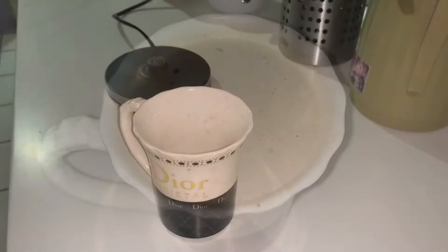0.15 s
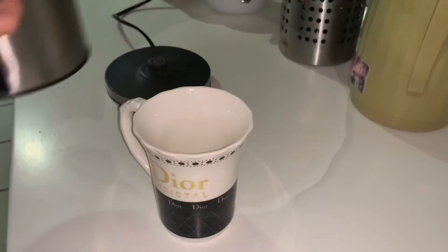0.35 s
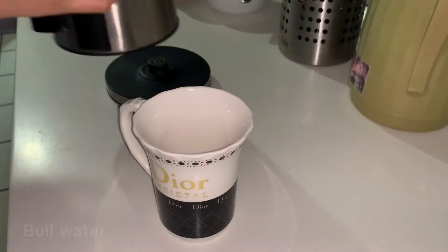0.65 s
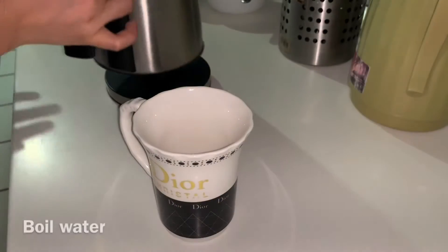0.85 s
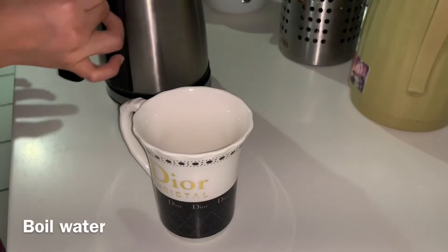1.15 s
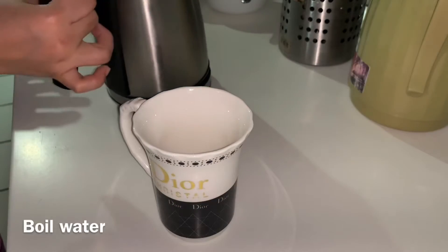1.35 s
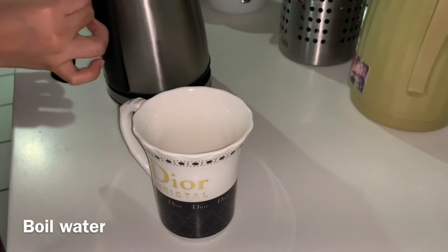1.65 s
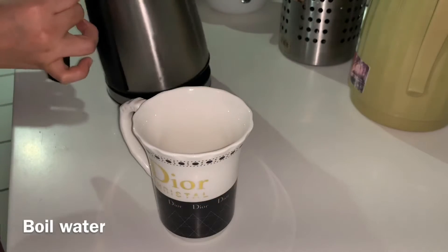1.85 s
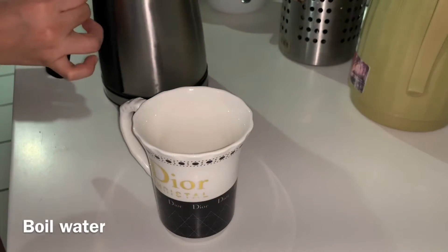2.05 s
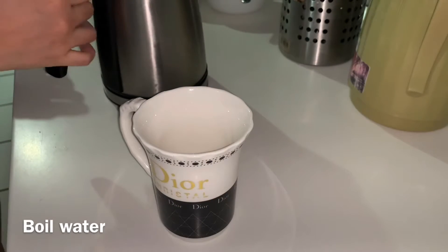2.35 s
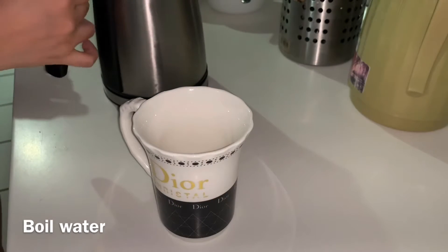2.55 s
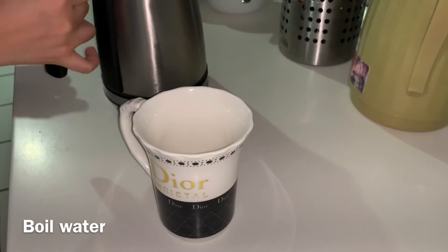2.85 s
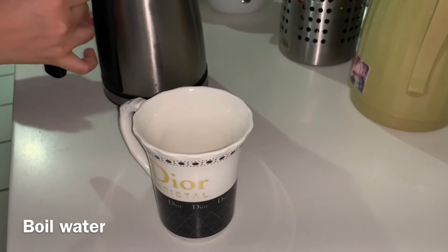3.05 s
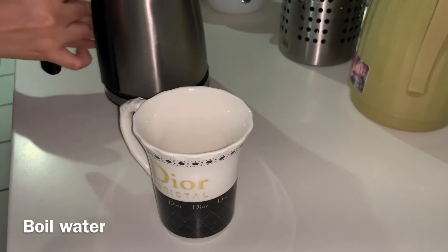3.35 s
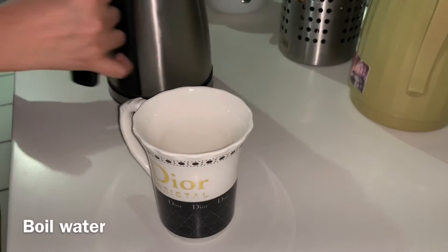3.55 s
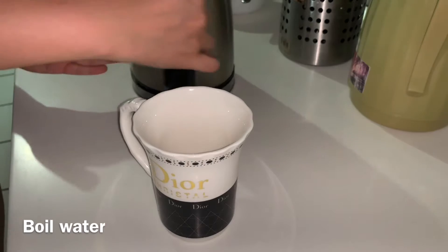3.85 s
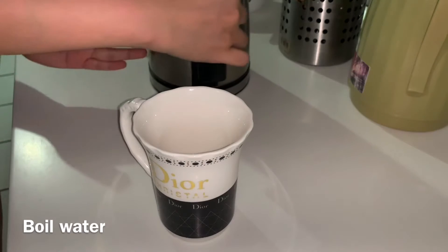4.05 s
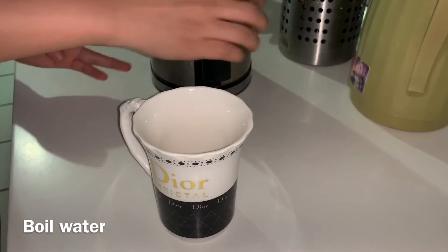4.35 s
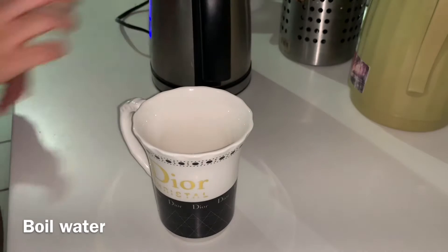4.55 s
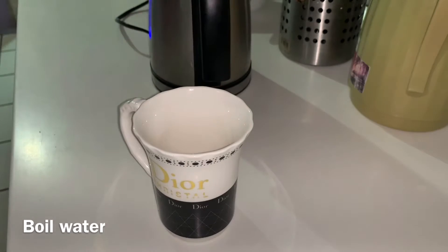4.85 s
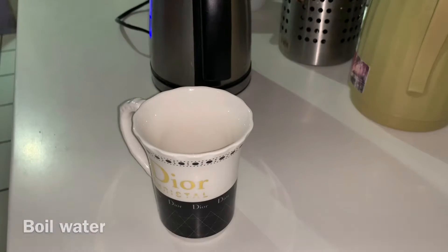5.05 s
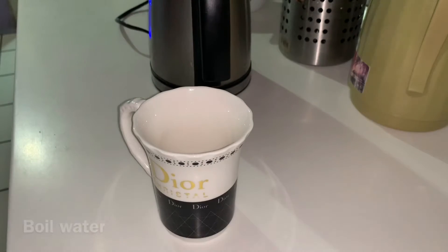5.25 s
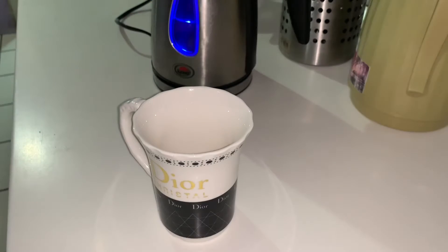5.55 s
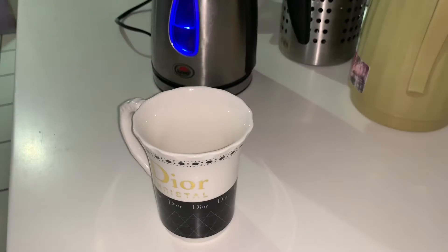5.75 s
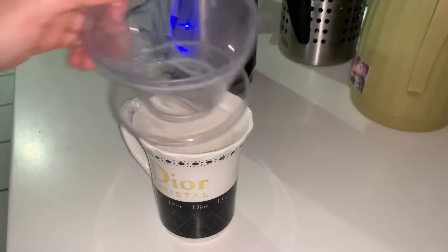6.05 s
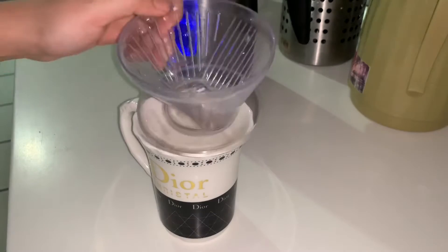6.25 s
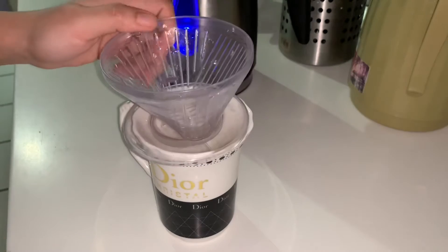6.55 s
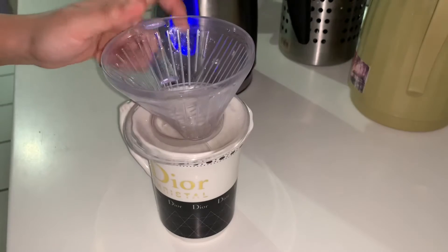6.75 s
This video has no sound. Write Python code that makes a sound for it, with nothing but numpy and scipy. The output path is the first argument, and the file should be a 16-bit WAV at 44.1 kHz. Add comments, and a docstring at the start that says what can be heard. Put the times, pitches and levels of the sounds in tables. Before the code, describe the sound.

A steel kettle lid snaps shut, the kettle knocks onto its base and grinds round, then heating hiss starts and a plastic dripper clatters onto a mug.

```python
"""In a small hard room with a low hum, a steel kettle's lid snaps shut: noise cracks plus ringing tones. The
kettle is set on its base with knocks, plops of water and booms of the counter, then turned into place in short
strokes of grainy noise, with clicks, a fingernail tap and crunches of the handle. Then a hiss comes in abruptly
and grows: tiny random clicks, for collapsing steam bubbles, ring the vessel. Last a plastic dripper clatters
onto a china mug; both ring as fading sines."""
import sys
import numpy as np
from scipy import signal
from scipy.fft import rfft, irfft, next_fast_len
from scipy.io import wavfile
from scipy.ndimage import uniform_filter1d, map_coordinates

SR = 44100
rng = np.random.default_rng(int(sys.argv[2]) if len(sys.argv) > 2 else 0)


def to_wav(sig):
    """Store sig (one row per channel, or 1-D mono) as 16-bit WAV at the path in sys.argv[1].

    Samples outside -1..1 are clipped; the rate is SR.
    """
    pcm = np.clip(np.atleast_2d(sig), -1, 1) * 32767
    pcm = np.round(pcm).astype(np.int16)
    wavfile.write(sys.argv[1], SR, pcm.T)  # frames by channels


N = 303893
TIME = np.arange(N) / SR  # seconds

# Levels in the tables are relative: scene() balances the layers afterwards.
# Room air and hum
# rumble of the air: f/Hz, level/dB
AIR_COLOUR = [(45, -6), (120, -5), (200, -11), (380, -16.5), (520, -24), (800, -22.5), (1200, -30),
              (2500, -38), (5000, -46), (8500, -49.5), (14000, -55.5), (15200, -67)]
# tones of an appliance: f/Hz, level/dB
HUM_TONES = [(82, -70), (119, -57.5), (241, -64), (350, -73.5)]

# A faint bright hiss at the very start, then strokes of the kettle sliding under the hand: t/s, length/s,
# level/dB, brightness/(dB per octave)
SLIDES = [(0.0, 0.14, -58, 5.5), (0.321, 0.037, -54.5, 4), (.62, 0.087, -56, 5.5), (0.712, 0.041, -59.5, 5),
          (1.336, 0.067, -53, -4), (1.798, 0.03, -35.5, -6.5), (2.977, 0.049, -63, -3.5),
          (3.251, 0.13, -58.5, 1.5), (3.445, 0.32, -65, 2.5), (3.8, 0.21, -61, -0.5),
          (4.141, 0.054, -55.5, 1.5), (4.326, 0.17, -67, 7), (4.65, 0.33, -66.5, 3),
          (4.946, 0.055, -49, 0.5)]
# colour of sliding plastic: f/Hz, level/dB
SLIDE_COLOUR = [(200, -8.5), (500, 0), (900, 2), (1200, -2), (2400, -1.5), (3300, -3), (5000, -10),
                (8000, -16), (13000, -30.5), (15000, -33)]
# shortest time to full pressure; time to fall 60 dB
SLIDE_ATTACK_S, SLIDE_RELEASE_S = 0.018, 0.38
# a longer stroke swells more slowly: this share of its length adds to its attack
SWELL_SHARE = 0.19

# Lid latch and lid seating: t/s, level/dB, brightness/(dB per octave), hollow ring/dB
LID_BLOWS = [(.0748, -12.5, 0, -23.5), (.0808, -12.5, -1.5, -15), (.083, -8.5, -2.5, 0.5)]
# tones of the lid: f/Hz, level/dB, time to fall 60 dB/s
LID_MODES = [(125, -7.5, .16), (207, -1.5, 0.12), (253, 10, 0.09), (324, 23.5, 0.03), (377.7, 0.5, 0.2),
             (540, -7, 0.12), (794, -8.5, 0.07), (1286, -12.5, 0.28), (1577, -8.5, .08), (1905, -17, 0.14),
             (2670, -12.5, .15), (2894, -9, 0.071), (4700, -29, 0.38), (5300, -23.5, 0.18)]
# contact noise of the lid: f/Hz, level/dB
LID_CRACK = [(200, 3.5), (380, 6.5), (520, -2.5), (800, -5.5), (1500, 0.5), (3600, -6.5), (5000, 8),
             (6500, -1.5), (10500, 1), (14000, -4.5), (15800, -19.5)]

# Bright rasps of the steel as it is lifted, dropped home and twisted: t/s, length/s, level/dB
RASPS = [(0.614, 0.15, -67), (1.833, 0.015, -42.5), (1.879, 0.0052, -35), (3.496, 0.23, -73.5),
         (3.8, 0.17, -70.5), (4.74, 0.25, -72.5)]
# colour of the rasps: f/Hz, level/dB
RASP_COLOUR = [(3000, -7), (6000, -7.5), (10500, 0), (14000, -6), (15500, -31)]

# The hollow foot scuffs as the kettle is carried and lowered: t/s, length/s, level/dB
SCUFFS = [(.631, 0.021, -42.5), (.69, 0.049, -53), (1.02, 0.0075, -42), (1.417, 0.016, -55),
          (1.47, 0.042, -60.5), (3.128, .02, -54), (3.85, 0.14, -70), (5.325, 0.014, -53)]
# colour of the scuffs: f/Hz, level/dB
SCUFF_COLOUR = [(300, 1), (600, -7), (1050, -4.5), (1900, -4), (2400, -19), (6000, -33.5)]

# Kettle against its base: t/s, level/dB, brightness/(dB per octave), hollow ring/dB
KNOCKS = [(.639, -30.5, -0.5, -20), (.704, -40, -15, -20), (1.0305, -10.5, 1.5, -5), (1.037, -12.5, 3, 8),
          (1.059, -23, -11, -6), (1.087, -25, 1.5, -7), (1.1445, -16, 0.5, -8), (1.153, -26.5, -1, 18.5),
          (1.2025, -17, 1, -27), (1.2478, -26, -0.5, -27), (1.417, -31.5, -4, 5), (1.8255, -14, 0.5, 1.5),
          (1.839, -18, -8, 5), (1.852, -22.5, -4, -9), (1.8905, -10.5, 1.5, -8), (2.137, -35.5, -4.5, -22),
          (3.14, -29.5, -0.5, -5), (3.766, -32.5, -3.5, -8), (3.842, -26, -2, -15), (3.897, -42, 4, 6),
          (4.226, -37, -10, -8), (4.604, -34.5, -10.5, 2.5), (4.698, -34.5, -1.5, 8),
          (5.119, -33, -3.5, 4.5), (5.328, -37.5, -2, 9.5)]
# tones of the kettle: f/Hz, level/dB, time to fall 60 dB/s
KETTLE_MODES = [(350, 9, 0.056), (351, -5.5, 0.12), (567, -2, 0.052), (791, 1.5, 0.1), (856, 1, 0.054),
                (938, 4.5, 0.072), (983, 2, 0.049), (1154, -7, 0.07), (1325, -3.5, 0.072),
                (1440, -6, 0.048), (1690, -3, 0.028), (1859, 1.5, 0.046), (2006, 0, 0.043), (2010, -30, 1),
                (2160, -2, 0.045), (2700, -5, 0.045), (2830, -9, 0.033), (3520, -19, 0.033)]
# contact noise of the kettle: f/Hz, level/dB
KETTLE_CRACK = [(130, 1.5), (500, -4.5), (1000, 3.5), (1600, -4), (2600, -11), (3800, -19), (7000, -35),
                (13000, -50), (16000, -65)]

# Water plops in the kettle as it is moved: t/s, starting f/Hz, level/dB
PLOPS = [(.737, 510, -37.5), (3.246, 590, -42), (3.305, 637, -39.5), (3.372, 342, -36.5), (3.468, 378, -43),
         (4.084, 384, -39.5)]
# ring time; pitch gained per second, as a share of the start pitch
PLOP_T60_S, PLOP_RISE_PER_S = 0.024, 2.9

# Weight landing on the counter: t/s, level/dB
THUMPS = [(1.034, -33.5), (1.148, -39.5), (1.83, -22.5), (1.89, -21.5), (2.102, -33.5), (2.596, -37.5),
          (3.139, -39), (3.339, -42.5), (3.441, -44), (3.904, -31.5), (4.093, -39), (4.229, -36),
          (4.613, -39), (4.712, -28), (5.032, -37), (5.132, -28.5), (6.357, -41.5)]
# tones of the counter: f/Hz, level/dB, time to fall 60 dB/s
COUNTER_MODES = [(59.7, -4, 0.53), (75.7, 2, 0.24), (113.9, -0.5, 0.33)]
# a landing of PUSH_REF_DB pushes for PUSH_S; the push doubles in length every PUSH_DOUBLING_DB above it
PUSH_S, PUSH_REF_DB, PUSH_DOUBLING_DB = 0.0076, -35, 28.5

# Handle and switch clicks: t/s, level/dB, brightness/(dB per octave), hollow ring/dB
CLICKS = [(2.403, -27, 1, -11), (2.6228, -27.5, 5.5, -15), (2.6322, -13, 5.5, 16.5), (2.639, -26, -12, -9),
          (3.016, -36.5, -1.5, -13)]
# tones of the handle and switch: f/Hz, level/dB, time to fall 60 dB/s
CLICK_MODES = [(408, -12, 0.046), (827, 0.5, 0.076), (1430, -2, 0.016), (1660, -8, 0.064), (2330, -7, .012),
               (3470, -27, 0.033), (4070, -18.5, .05)]
# contact noise of clicks and taps: f/Hz, level/dB
CLICK_CRACK = [(200, -15), (800, 1.5), (1150, -3), (1550, 7), (2200, -2.5), (3800, -7), (8000, -21.5),
               (14000, -33), (16000, -45)]

# Pushes that grind the kettle round on its base: t/s, length/s, level/dB
TURNS = [(3.231, 0.32, -53), (3.56, 0.46, -51.5)]
# colour of the grinding: f/Hz, level/dB
TURN_COLOUR = [(70, 22), (125, 18.5), (200, -4), (500, -4), (1000, -13.5), (1600, -6.5), (2400, -14),
               (3200, -18), (8000, -27.5)]
# resonances of the base under the turning foot: f/Hz, width/Hz, lift/dB
BASE_PEAKS = [(346, 58, 10), (887, 110, 23.5), (1207, 58, 16), (1940, 150, 9.5)]
# the foot catches at random while it is turned: middle level, and most it strays either way
CATCH_DB, CATCH_SPREAD_DB = -42, 2.5

# A fingernail taps the steel wall: t/s, level/dB, brightness/(dB per octave), hollow ring/dB
TAPS = [(3.488, -34.5, 8, 0)]
# tones of the steel wall: f/Hz, level/dB, time to fall 60 dB/s
STEEL_MODES = [(1980, -8, .2), (3170, 4, 0.051), (3247, -2.5, 0.15), (4590, -5, 0.038), (5260, -14, 0.042)]

# The plastic handle and switch crunch under the hand: t/s, length/s, level/dB
CRUNCHES = [(4.151, 0.013, -48.5), (4.812, 0.0076, -61), (4.96, 0.04, -53), (5.32, 0.021, -51.5)]
# colour of the crunches: f/Hz, level/dB
CRUNCH_COLOUR = [(500, 1), (1300, -2), (2200, 9), (3400, 0), (4500, -13), (8000, -20), (14000, -37)]

# Heating: colour of the hiss: f/Hz, level/dB
BOIL_COLOUR = [(100, -1), (280, -6.5), (400, -3), (700, -3.5), (1050, -6), (1400, -1), (2100, -1),
               (2900, -4.5), (4300, -5.5), (6300, -13.5), (8300, -13), (11000, -20.5), (14300, -26.5),
               (15500, -63)]
# resonances of the water-filled vessel: f/Hz, width/Hz, lift/dB
VESSEL_PEAKS = [(359, 50, 12.5), (465, 48, 13.5), (607, 92, 2.5), (794, 54, 15.5), (917, 68, 21.5),
                (1247, 185, 10.5), (1416, 140, 6.5), (1784, 44, 13.5), (2630, 240, 7.5), (3090, 54, 7.5),
                (3780, 140, 6.5), (4530, 110, 7), (6250, 360, 4), (7300, 190, 3), (8300, 350, -1)]
# colour of the rarer, larger bubbles, which pop in the middle range: f/Hz, level/dB
POP_COLOUR = [(400, 3.5), (1000, -4), (1600, -4.5), (2400, -13), (5000, -27), (12000, -21)]
# the hiss comes in abruptly, then grows slowly
HISS_START_S, HISS_ATTACK_S, HISS_DB, HISS_GROWTH_DB_PER_S = 5.386, 0.026, -37.5, 0.95

# Dripper on the mug rim: t/s, level/dB, brightness/(dB per octave), hollow ring/dB, mug ring/dB
DRIPPER_BLOWS = [(6.2151, -9, 2.5, 5.5, -2.5), (6.221, -22, -10, -4, -15), (6.2387, -12.5, -1, -5, -13),
                 (6.252, -17.5, -3, -1.5, -10), (6.261, -19, -1.5, -1.5, -10),
                 (6.3272, -16.5, -3, -12, -3.5), (6.347, -16.5, -7, 9, 7), (6.3517, -6, -0.5, 9.5, 2),
                 (6.358, -18.5, -3, 8, 2), (6.367, -14, -2.5, 13.5, 3), (6.373, -19, -1, 12.5, -2),
                 (6.398, -18, -3, 8, -8), (6.4411, -17, -0.5, 14.5, -9), (6.45, -24, -3, 8, -19),
                 (6.528, -21, -4, -5, -5)]
# tones of the dripper: f/Hz, level/dB, time to fall 60 dB/s
DRIPPER_MODES = [(111, 0, 0.12), (224, -14, 0.19), (453, -11, 0.056), (752, -0.5, 0.084), (928, -5, 0.073),
                 (1234, 8, .06), (1378, 8, 0.04), (1826, 6, 0.07), (1960, 7, 0.046), (2131, 11.5, 0.069),
                 (2360, -3, .035), (2600, 3, 0.097), (3235, 9.5, 0.06), (3426, 7.5, 0.045),
                 (3740, 8, 0.032), (4700, 1, 0.062), (6080, 3, 0.021), (6790, 7, 0.038), (10300, -5, .025),
                 (12050, 1, 0.02)]
# contact noise of the dripper: f/Hz, level/dB
DRIPPER_CRACK = [(300, 6.5), (800, -2), (2000, 3), (3400, 5.5), (4300, 2), (8200, 4), (9300, 4),
                 (10400, 7.5), (11600, -7), (13300, -2), (15200, -18), (16000, -17)]
# tones of the china mug: f/Hz, level/dB, time to fall 60 dB/s
MUG_MODES = [(1197, 10, 0.056), (3567, 8, .05), (5070, 0.5, 0.081), (6370, 5, 0.062), (8140, 9.5, 0.039),
             (10540, 3.5, 0.024), (12100, 2, .02), (12800, 4, 0.021), (13400, 6, .03)]

# time a contact takes to build up its force; touches per second of loose parts after a blow
CONTACT_RISE_S, RATTLE_PER_S = 0.0011, 900
# moving water and a shifting grip make resonances waver by about these shares
WATER_WAVER, GRIP_WAVER = 0.014, 0.02


def undb(db):
    """Decibels to gain."""
    return 10 ** (np.asarray(db) / 20)


def unit(x):
    """Scale to an rms (average strength) of 1."""
    return x / np.sqrt(np.mean(x ** 2))


def fade(t, t60):
    """Exponential decay, by 60 dB in t60 seconds."""
    return np.exp(-np.log(1000) * t / t60)


def add(track, s, sound):
    """Mix a sound into a track, starting at s seconds."""
    i = int(s * SR)
    track[i:i + len(sound)] += sound[:N - i]


def walk(rate):
    """Slow random wander around zero, heading for a new value `rate` times a second."""
    k = int(SR / rate)
    steps = np.repeat(rng.standard_normal(N // k + 2), k)
    return uniform_filter1d(steps, k)[:N]


def colour(x, points, tilt_db=0, peaks=()):
    """Filter by a smooth spectrum, a slope per octave and resonances."""
    size = next_fast_len(x.shape[-1] + 2048)
    f = np.maximum(np.fft.rfftfreq(size, 1 / SR), 1)
    hz, db = np.transpose(points)
    # the slope pivots at 1500 Hz and is flat below 300 Hz
    slope_db = tilt_db * np.log2(np.maximum(f, 300) / 1500)
    gain = undb(np.interp(np.log(f), np.log(hz), db) + slope_db)
    gain = gain * np.minimum(f / hz[0], 1) ** 2  # falls away below the first point
    lifts = sum((undb(lift) ** 2 - 1) / (1 + (2 * (f - centre) / width) ** 2) ** 2
                for centre, width, lift in peaks)
    gain = gain * np.sqrt(1 + lifts)
    return irfft(rfft(x, size) * gain, size)[..., :x.shape[-1]]


def diffuse(pair, alike_hz):
    """Two unrelated signals become sound from all around: long waves reach both ears alike."""
    a, b = rfft(pair)
    f = np.fft.rfftfreq(pair.shape[1], 1 / SR)
    alike = 0.92 / (1 + (f / alike_hz) ** 2)
    mid = a * np.sqrt((1 + alike) / 2)
    side = b * np.sqrt((1 - alike) / 2)
    return irfft(np.array([mid + side, mid - side]), pair.shape[1])


def burst(t, t60, rise_s=0):
    """Decaying noise with a nearly even spectrum: a dense cluster of tiny impulses."""
    rise = 1 - np.exp(-(t + 1 / SR) / (rise_s + 1 / SR))
    x = rng.standard_normal(len(t)) * fade(t, t60) * rise
    for _ in range(4):
        even = irfft(np.exp(1j * np.angle(rfft(x))), len(t))  # same strength at every frequency
        x = even * fade(t, 10 * t60)
    return x


def stroke(start_s, length_s, attack_s, release_s):
    """One movement of the hand: pressure swells, holds for the stroke and dies away."""
    t = TIME - start_s
    swell = np.clip(t / (attack_s + SWELL_SHARE * length_s), 0, 1)
    return swell * fade(np.maximum(t - length_s, 0), release_s)


def waver(x, share, rate):
    """Let all resonances drift up and down together, by reading the sound at an uneven speed."""
    place = np.arange(N) + share * np.cumsum(walk(rate))
    return np.apply_along_axis(lambda v: map_coordinates(v, [place], order=3, mode="mirror"), -1, x)


def flurries(x, depth_db, rate):
    """Each octave swells and ebbs on its own, as bubbles or catches of one size come in bunches."""
    size = next_fast_len(N)
    f = np.maximum(np.fft.rfftfreq(size, 1 / SR), 1)
    octave = np.clip(np.log2(f / 250), 0, 5)
    spectrum = rfft(x, size)
    out = 0
    for k in range(6):
        share = np.maximum(1 - np.abs(octave - k), 0)  # neighbouring bands overlap
        band = irfft(spectrum * share, size)[..., :N]
        out = out + band * undb(depth_db * walk(rate))
    return out


def ring(modes, lift_db, hollow_hz, detune):
    """The modes of a struck thing; grip and point of contact shift their pitch and strength a little."""
    t = np.arange(SR // 3) / SR
    hz, db, t60 = np.transpose(modes)[:, :, None]
    strength, sign, pitch = rng.standard_normal((len(modes), 3)).T[:, :, None]
    # the low hollow modes all start the same way, the others either way
    side = np.where(hz < hollow_hz, 1, np.sign(sign))
    # a mode takes about one cycle to build up
    envelope = fade(t, t60) * (1 - np.exp(-t * hz))
    tones = np.sin(2 * np.pi * hz * (1 + detune * pitch) * t)
    return np.sum(side * undb(db + lift_db + 2 * strength) * envelope * tones, axis=0)


def blows(rows, modes, crack, contact_t60, rattle_db, rattle_t60, ring_db, hollow_hz, detune):
    """Each blow is a brief contact crack, a dying rattle of tiny rebounds, and the object's modes."""
    out, t = np.zeros(N), np.arange(SR // 3) / SR
    hz = np.array(modes)[:, :1]
    for s, db, tilt_db, hollow_db in rows:
        touches = rng.random(len(t)) < RATTLE_PER_S / SR
        rattle = rng.standard_normal(len(t)) * touches * fade(t, rattle_t60)
        contact = unit(burst(t, contact_t60, CONTACT_RISE_S)) + undb(rattle_db) * unit(rattle)
        # 5 ms of silence in front leaves room for the filter's spread
        noise = colour(np.pad(contact, (SR // 200, 0)), crack, tilt_db)
        noise = noise * np.sqrt(SR / 1000 / np.sum(noise ** 2))  # same energy for every blow
        add(out, s - 1 / 200, undb(db) * noise)
        # below hollow_hz the modes have their own level, above it they follow the brightness
        shape_db = np.where(hz < hollow_hz, hollow_db, tilt_db * np.log2(hz / hollow_hz))
        add(out, s, ring(modes, db + ring_db + shape_db, hollow_hz, detune))
    return out


def rub(rows, points, attack_s, release_s, grain_db, grains_per_s, peaks=()):
    """Stick and slip: grainy friction whose colour shifts with the grip, played in strokes."""
    slips = rng.standard_normal(N) * undb(grain_db * walk(grains_per_s))
    pressure = sum(undb(db) * stroke(s, length_s, attack_s, release_s) for s, length_s, db in rows)
    rubbing = waver(colour(slips, points, peaks=peaks), GRIP_WAVER, 12)
    return unit(rubbing) * pressure


def kitchen(x, lag_s, near_db, room_db, pan_db):
    """Direct sound, later on the left; quick reflections from counter and tiles; then the room's tail."""
    t = np.arange(SR * 2 // 3) / SR
    near = diffuse(np.array([burst(t, 0.032), burst(t, 0.053)]), 1400)
    near = near * ((t > 0.001) & (t < 0.1))
    tail = diffuse(rng.standard_normal((2, len(t))), 320) * (1 - np.exp(-t / 0.003))
    treble = signal.sosfilt(signal.butter(1, 7000, "high", fs=SR, output="sos"), tail)
    tail = (tail - treble) * fade(t, 0.37) + treble * fade(t, 0.32)  # treble dies sooner
    response = (undb(near_db) * unit(near) + undb(room_db) * unit(tail)) / np.sqrt(len(t))
    wet = signal.fftconvolve(x[None], response, axes=1)[:, :N]
    wet = colour(wet, [(100, -6.5), (400, -4.5), (900, 1.5), (14000, 2.0)])
    direct = np.array([np.roll(x, int(round(lag_s * SR))), x])
    # pan_db is how much louder the left is made than the right
    return (direct + wet) * undb(np.array([[pan_db], [-pan_db]]) / 2)


def background():
    """Low room rumble and a wavering appliance hum."""
    air = unit(colour(diffuse(rng.standard_normal((2, N)), 730), AIR_COLOUR))
    air = air * undb(-54.0 + 0.81 * walk(5.4))
    hum = sum(undb(db + 1.2 * walk(12.0)) * np.sin(2 * np.pi * hz * TIME + 0.7 * walk(7.6))
              for hz, db in HUM_TONES)
    return (air + hum) * undb(np.array([[-0.9], [0.9]]))


def sliding():
    """Fine catches of plastic on plastic, noise that is thicker and thinner along the stroke."""
    grain_db = 1.2 * rng.standard_normal(N) + 1.4 * walk(60)
    grains = rng.standard_normal(N) * undb(grain_db)
    out = np.zeros(N)
    for s, length_s, db, tilt_db in SLIDES:
        pressure = stroke(s, length_s, SLIDE_ATTACK_S, SLIDE_RELEASE_S)
        out += unit(colour(grains, SLIDE_COLOUR, tilt_db)) * undb(db) * pressure
    return undb(-2.5) * out


def lid_shutting():
    """The latch and the lid strike the vessel, which cracks, rattles and rings."""
    return blows(LID_BLOWS, LID_MODES, LID_CRACK, contact_t60=0.029, rattle_db=-14.0, rattle_t60=0.082,
                 ring_db=-16.0, hollow_hz=600, detune=0.0075)


def rasping():
    """Steel slips along in fine, fast grains that make a bright rasp."""
    return rub(RASPS, RASP_COLOUR, attack_s=0.013, release_s=0.011, grain_db=3.0, grains_per_s=300)


def scuffing():
    """The hollow foot sticks and slips in quick, coarse scuffs."""
    return rub(SCUFFS, SCUFF_COLOUR, attack_s=0.0012, release_s=0.12, grain_db=4, grains_per_s=250)


def kettle_knocks():
    """The kettle knocks on its base and rings, also at small catches while it is turned."""
    return blows(KNOCKS + catches(count=4), KETTLE_MODES, KETTLE_CRACK, contact_t60=0.0144,
                 rattle_db=-8.5, rattle_t60=0.19, ring_db=-14, hollow_hz=607, detune=0.022)


def plops():
    """Air pockets in the sloshing water ring briefly and rise in pitch."""
    out, t = np.zeros(N), np.arange(SR // 8) / SR
    for s, hz, db in PLOPS:
        envelope = (1 - np.exp(-t * hz)) * fade(t, PLOP_T60_S)
        tone = np.sin(2 * np.pi * hz * t * (1 + PLOP_RISE_PER_S * t / 2))
        add(out, s, undb(db) * envelope * tone)
    return out


def counter():
    """Soft pushes set the worktop booming; a heavier landing pushes longer and gives a deeper boom."""
    out, t = np.zeros(N), np.arange(SR // 2) / SR
    boom = sum(undb(db) * np.sin(2 * np.pi * hz * t) * fade(t, t60) for hz, db, t60 in COUNTER_MODES)
    for s, db in THUMPS:
        push_s = PUSH_S * 2 ** ((db - PUSH_REF_DB) / PUSH_DOUBLING_DB)
        push = np.sin(np.pi * np.minimum(t / push_s, 1)) ** 2
        add(out, s, undb(db) * signal.fftconvolve(boom, push / push.sum())[:len(t)])
    return out * undb(np.array([[-1.8], [0]]))


def clicks():
    """Small hard parts of the handle and switch snap together and ring."""
    return blows(CLICKS, CLICK_MODES, CLICK_CRACK, contact_t60=0.0132, rattle_db=-5, rattle_t60=0.085,
                 ring_db=-14.0, hollow_hz=606, detune=0.024)


def turning():
    """The foot grinds round, sticking and slipping, and makes the base resonate."""
    return rub(TURNS, TURN_COLOUR, attack_s=0.1, release_s=0.51, grain_db=3.0, grains_per_s=65,
               peaks=BASE_PEAKS)


def catches(count):
    """Rows for small knocks at random moments of each turning push."""
    rows = []
    for s, length_s, _ in TURNS:
        for when, size in rng.random((count, 2)):
            rows.append((s + length_s * when, CATCH_DB + CATCH_SPREAD_DB * (2 * size - 1), -1, -6))
    return rows


def nail_taps():
    """A fingernail on the steel wall gives a small crack and a ring."""
    return blows(TAPS, STEEL_MODES, CLICK_CRACK, contact_t60=0.012, rattle_db=-18, rattle_t60=0.054,
                 ring_db=-23.0, hollow_hz=600, detune=0.0008)


def crunching():
    """Gripped plastic slips in very fast, strong grains."""
    return rub(CRUNCHES, CRUNCH_COLOUR, attack_s=0.00083, release_s=0.042, grain_db=5, grains_per_s=500)


def boiling(bubbles_per_s, surge_db, pops_per_s, pop_db):
    """Steam bubbles collapse, a few larger ones pop; water softens the clicks, which ring the vessel."""
    sizes = rng.standard_normal((2, N))
    collapses = rng.random((2, N)) < bubbles_per_s / SR
    small = unit(sizes * collapses * undb(surge_db * walk(25)))
    large = unit(colour(sizes * (rng.random((2, N)) < pops_per_s / SR), POP_COLOUR))
    smear = burst(np.arange(SR // 10) / SR, 0.0435)
    bubbles = signal.fftconvolve(small + undb(pop_db) * large, smear[None], axes=1)[:, :N]
    roar = colour(diffuse(bubbles, 960), BOIL_COLOUR, peaks=VESSEL_PEAKS)
    hiss = unit(flurries(waver(roar, WATER_WAVER, 14), depth_db=2.4, rate=35))
    t = TIME - HISS_START_S
    level = np.clip(t / HISS_ATTACK_S, 0, 1) * undb(HISS_DB + HISS_GROWTH_DB_PER_S * t)
    return hiss * level * undb(np.array([[-0.3], [0.3]]))


def dripper():
    """The light plastic cracks, rattles and rings at each touch of the mug rim."""
    return blows([row[:4] for row in DRIPPER_BLOWS], DRIPPER_MODES, DRIPPER_CRACK, contact_t60=0.0094,
                 rattle_db=-11, rattle_t60=0.032, ring_db=-18.5, hollow_hz=983, detune=0.009)


def mug(ring_db):
    """The china rings under each touch of the dripper, by its own amount each time."""
    out = np.zeros(N)
    for s, db, _, _, mug_db in DRIPPER_BLOWS:
        add(out, s, ring(MUG_MODES, db + mug_db + ring_db, hollow_hz=0, detune=0.0012))
    return out


def scene():
    """The lid shuts off to one side, the kettle stands at the back, the mug is close."""
    lid = lid_shutting() * undb(-1.5)
    friction = flurries(sliding() + turning(), depth_db=2, rate=28) + rasping() + scuffing() + crunching()
    kettle = kettle_knocks() * undb(-8.5) + plops()
    small_hits = (clicks() + nail_taps()) * undb(-13.5)
    clatter = (dripper() + mug(ring_db=-16.5)) * undb(-8.0)
    return (background()
            + kitchen(friction * undb(-4.0), lag_s=0.00021, near_db=2.0, room_db=-4.0, pan_db=0.0)
            + kitchen(lid, lag_s=0.0003, near_db=-8, room_db=-4.5, pan_db=1.0)
            + kitchen(kettle, lag_s=0.00026, near_db=-2, room_db=-4.5, pan_db=-0.1)
            + counter()
            + kitchen(small_hits, lag_s=0.00021, near_db=-1.5, room_db=-4.0, pan_db=0.0)
            + boiling(bubbles_per_s=9000, surge_db=0.5, pops_per_s=300, pop_db=-14.5)
            + kitchen(clatter, lag_s=0.00039, near_db=-5, room_db=-9.5, pan_db=-0.9))


def record(dry):
    """The microphone sheds the deepest bass and the top."""
    bass_cut = signal.butter(7, 42, "high", fs=SR, output="sos")
    top_cut = signal.ellip(8, 0.2, 80, 16000, fs=SR, output="sos")
    return signal.sosfilt(top_cut, signal.sosfilt(bass_cut, dry))


dry = scene()
out = record(dry)
to_wav(out)
```